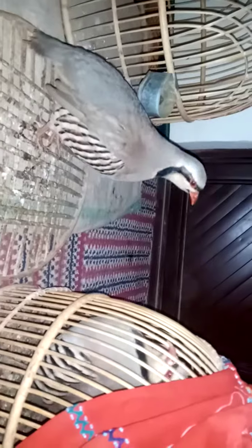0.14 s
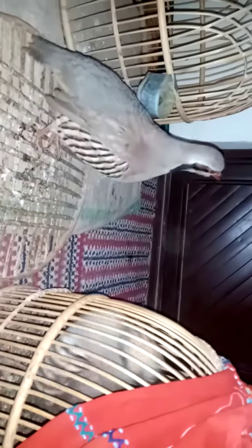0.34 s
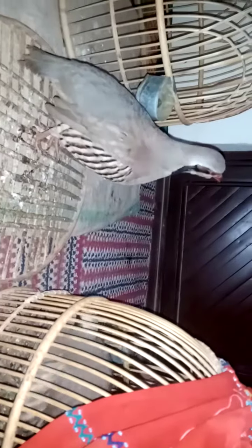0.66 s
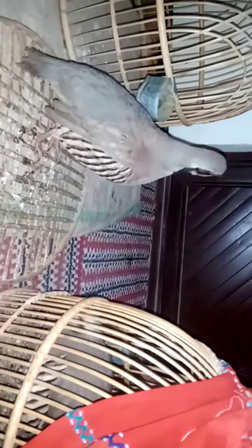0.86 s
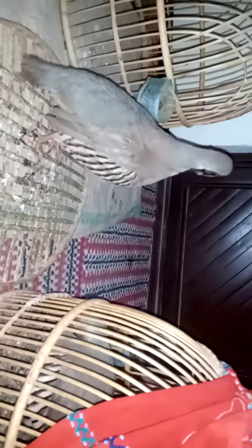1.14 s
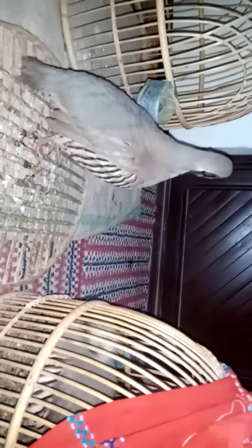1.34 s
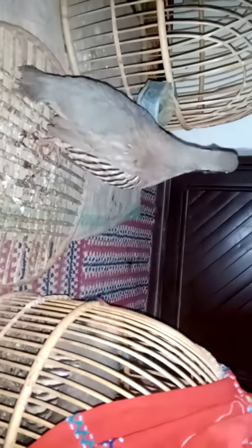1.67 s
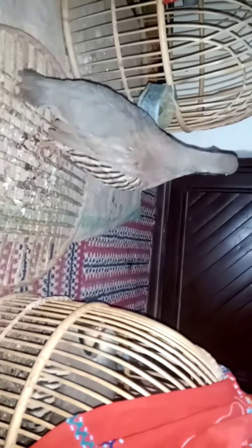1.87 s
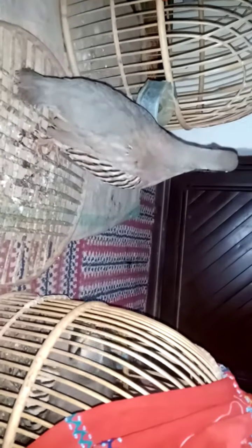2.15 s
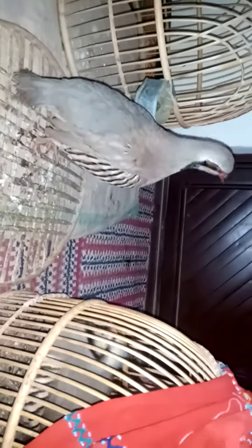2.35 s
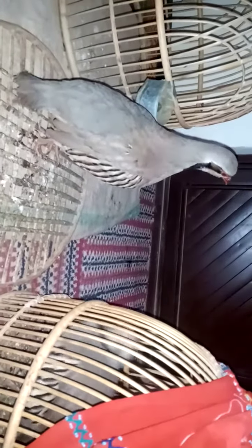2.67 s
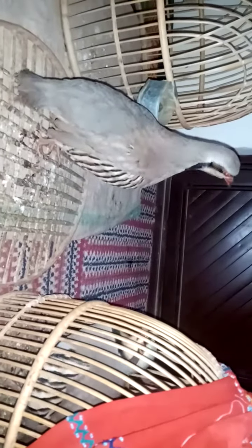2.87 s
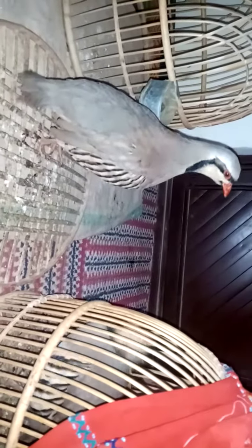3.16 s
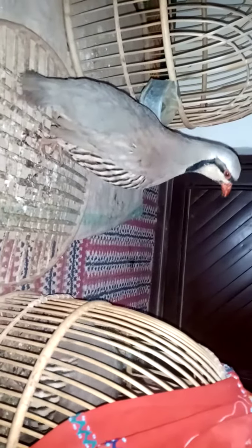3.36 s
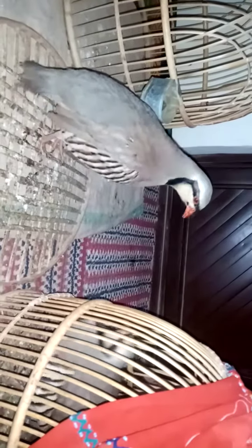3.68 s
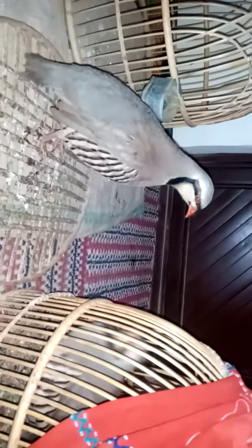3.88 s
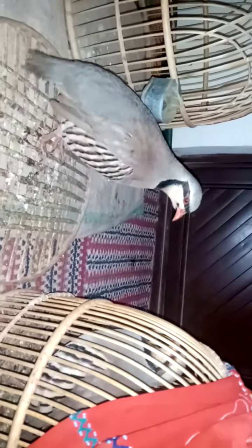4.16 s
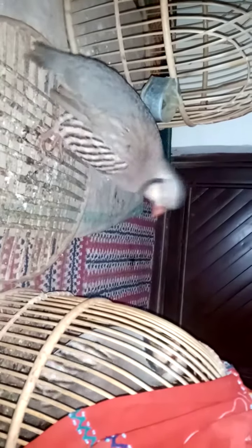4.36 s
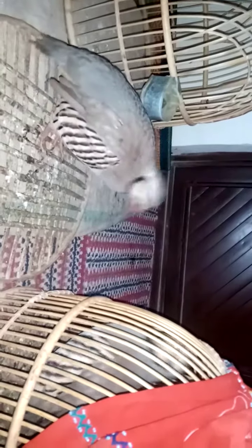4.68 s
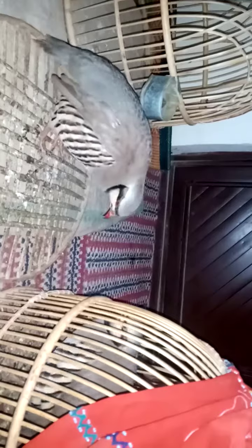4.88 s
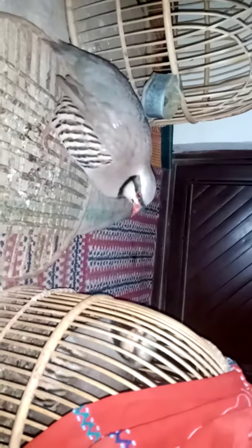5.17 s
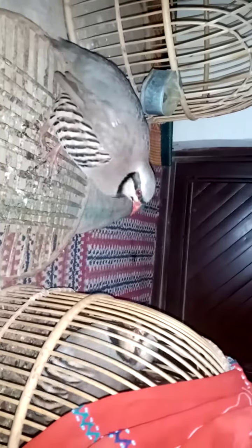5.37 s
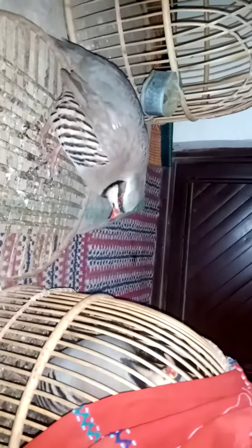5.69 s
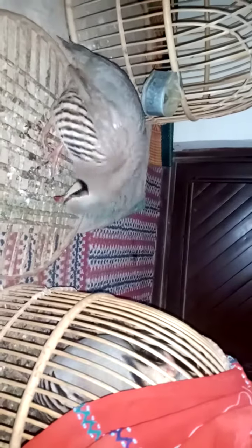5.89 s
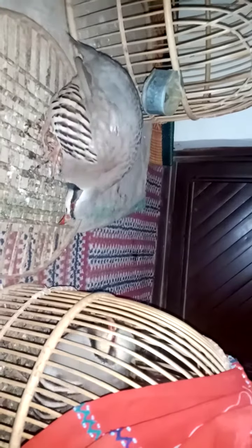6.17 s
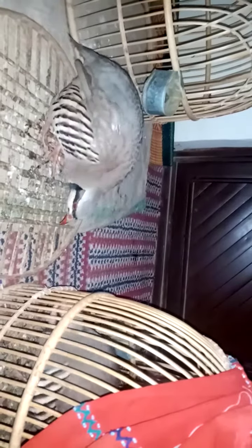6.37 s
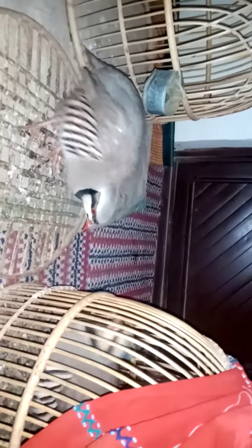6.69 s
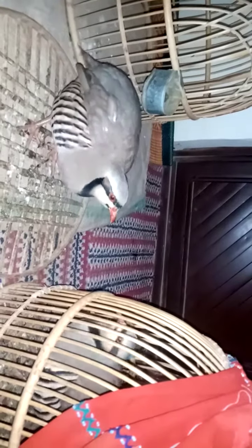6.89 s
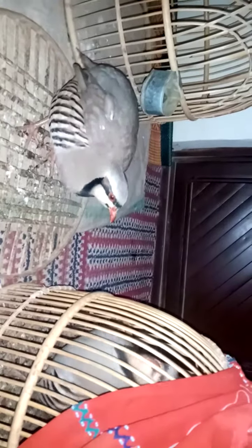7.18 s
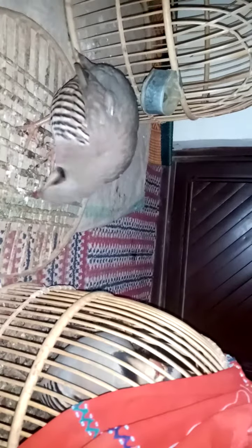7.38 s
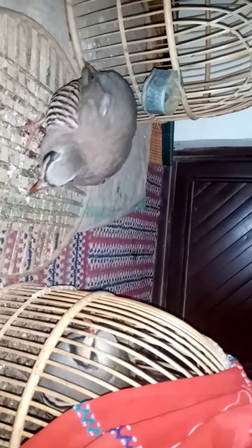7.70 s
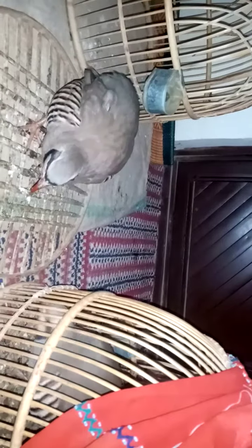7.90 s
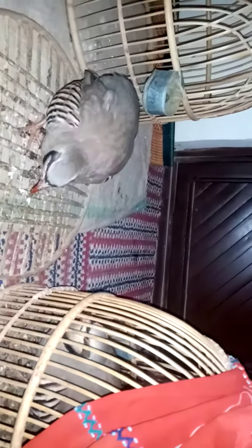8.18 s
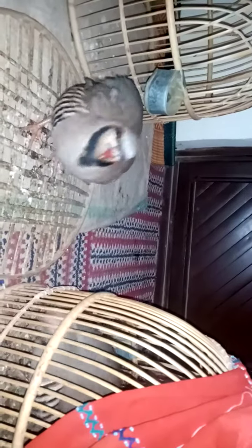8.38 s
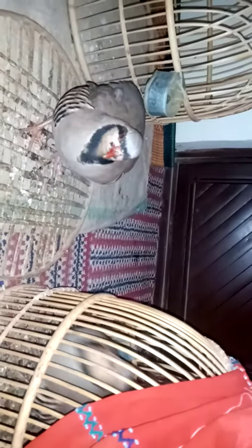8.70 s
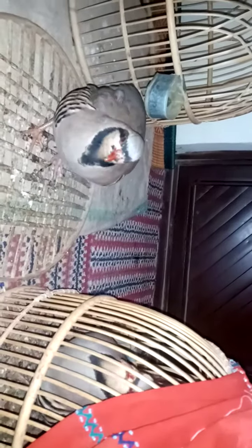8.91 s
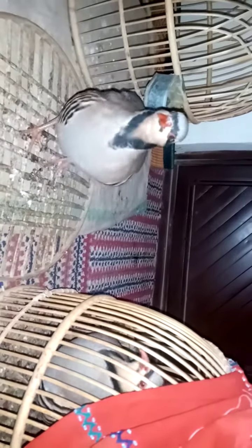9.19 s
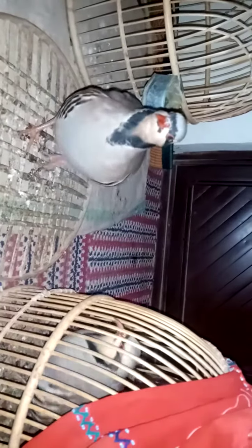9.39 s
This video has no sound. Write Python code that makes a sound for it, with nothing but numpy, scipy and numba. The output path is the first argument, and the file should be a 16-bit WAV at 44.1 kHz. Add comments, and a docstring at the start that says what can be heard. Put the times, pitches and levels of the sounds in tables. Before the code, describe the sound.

A partridge calls without a break, close to the microphone in a small room. From the start until about 4 seconds it gives a fast run of short, hoarse rasps and falling clucks, several each second, with an occasional high squeak among them. From about 4.5 to 7 seconds the clucking eases off and the squeaks stand out, roughly two a second, each climbing, arching and dropping into a brief rattle. From about 7 seconds the clucks pick up again, softer and rounder than at first, and continue to the end at around 9.5 seconds, with one faint squeak near 9 seconds. A few light, dry ticks of beak and claws on a mat come mostly in the second half, the clearest at about 8.6 seconds. The room rings briefly after every note, and a faint steady hiss lies underneath.

```python
"""A small room with cane cages; a chukar partridge calls without a break, close to a phone's microphone.
Its syrinx rattles in hoarse rasps, most phrases close on a falling cluck, and now and then it tightens
into a squeak that climbs, flips into a high arch and drops back into a rattle. Softer notes ring more in
the chest. Beak and claws tick on the mat, and the room rings briefly after every note, over faint hiss."""
import sys
import numpy as np
from scipy import signal
from scipy.fft import rfft, irfft
from scipy.io import wavfile
from numba import njit

SR = 44100
rng = np.random.default_rng(int(sys.argv[2]) if len(sys.argv) > 2 else 0)


def waveform_to_disk(signal):
    """Save audio, clipped to [-1, 1], as 16-bit WAV at the path in sys.argv[1]."""
    frames = np.transpose(np.atleast_2d(signal))
    scaled = np.clip(frames, -1, 1) * 32767
    samples = np.round(scaled).astype(np.int16)
    wavfile.write(sys.argv[1], SR, samples)


N = 420713

# still air and microphone hiss: (frequency [Hz], level [dB])
ROOM_TONE = [(25, -4.5), (70, -9.5), (150, 2), (300, -0.5), (700, -5), (2000, -7.5), (6000, -12),
             (12000, -17.5), (15500, -10.5)]
# swells of a faint low rumble: (time [s], level [dB])
RUMBLE_SWELLS = [(.53, -75.5), (.66, -77.5), (1.201, -79.5), (1.72, -80.5), (2.631, -79.5), (3.22, -76.5),
                 (3.62, -81.5), (4.609, -77.5), (4.81, -81.5), (5.859, -76), (6.25, -85), (8.13, -84),
                 (8.45, -82), (8.64, -75.5)]
# colour of the room's ring: (frequency [Hz], gain [dB])
ROOM_COLOUR = [(100, -13.5), (400, 2), (800, 7.5), (1300, -1), (1750, -3.5), (2500, -4.5), (4000, 1),
               (6000, 0), (9000, 0.5), (16000, -15.5)]
# how long the room rings: (frequency [Hz], time to fall 60 dB [s])
ROOM_T60 = [(300, 0.45), (900, 0.34), (1600, 0.46), (3000, 0.38), (6000, 0.36), (12000, 0.16)]
# resonances of the room, a tick and a footfall: (frequency [Hz], width [Hz], gain [dB])
ROOM_MODES = [(457, 13, -7.5), (1860, 190, -4), (3200, 630, -7), (3820, 25, 7), (4860, 31, 3),
              (5630, 90, 3.5)]
TICK_MODES = [(1340, 250, 11), (2130, 730, 10), (3550, 770, -1.5), (5530, 1200, -9), (8100, 4600, -34.5)]
STEP_MODES = [(153, 37, -7), (330, 490, 0), (666, 280, -22)]
# beak and claws on the mat: (time [s], peak level [dB])
TICKS = [(1.306, -45), (2.591, -46), (6.583, -43), (7.558, -45.5), (7.593, -40), (7.860, -64.5),
         (7.908, -53.5), (8.012, -47.5), (8.376, -51.5), (8.416, -52.5), (8.627, -33)]
# resonances of the bird's airway: (frequency [Hz], width [Hz], gain [dB])
CHEST_MODES = [(450, 140, -5), (570, 80, 0.5), (765, 76, -2), (846.7, 91, 8.5), (1095, 354, 1.5)]
WINDPIPE_MODES = [(1180, 242, 1.8), (1647, 260, 1.7)]
BEAK_MODES = [(2050, 360, 2.5), (2217, 920, -3), (3050, 1630, -7.5)]
# the crouching bird draws in its neck and its chest rings lower: (time [s], chest tuning [factor])
POSTURE = [(0, 0.99), (6.7, 0.94), (7.3, 0.86), (9.5, 0.9)]
# chest of a soft note as the bird stretches, eases off and crouches: (time [s], relative level [dB])
CHEST_LEVELS = [(0, -1), (3.9, -2.5), (4.6, -4), (5.2, -8.5), (5.85, 2), (6.55, 0), (7.04, -10), (7.14, 0),
                (8.5, 0), (9.5, -1)]
# breath in rasps and clucks, fading as the bird eases off: (time [s], relative level [dB])
HISS_LEVELS = [(0, -19.5), (1.5, -17.5), (3, -19), (3.7, -16), (4.2, -19), (4.7, -21), (5.3, -38.5),
               (6, -23.5), (7.1, -35), (7.6, -25.5), (9.5, -28)]
# colour of the breath in a hoarse note and in a squeak: (frequency [Hz], gain [dB])
HOARSE_HISS = [(2500, -41), (3000, -17), (3400, 2), (4200, 4), (4700, -4), (5400, 0), (6600, -18),
               (7500, -9.5), (8500, -36.5), (11000, -37), (12000, -23.5), (13000, -41), (16000, -43.5)]
SQUEAK_HISS = [(400, -24.5), (900, -7.5), (2000, 18), (3500, 9), (5800, 6), (7000, -14.5), (8600, -27.5),
               (10000, -22.5), (12500, -21.5), (16000, -25)]
# what the airway lets through of a squeak: (frequency [Hz], gain [dB])
SQUEAK_AIRWAY = [(200, -39.5), (500, -13.5), (900, 3), (4200, 0.5), (4800, -1), (5800, 1.5), (7600, -6.5),
                 (8700, -11.5), (10000, 2), (12500, 7), (16000, 5.5)]
# whistles in two registers: (time [s], climb [s], arch [s], low pitch [Hz], top pitch [Hz],
# pointedness of the arch [exponent], relative levels of climb [dB], arch [dB], drop [dB], roughness [0-1])
SQUEAKS = [(.056, 0.012, 0.024, 1868, 3050, 0.54, -24.5, -37, -37.5, 0.5),
           (.487, 0.023, 0.0098, 1828, 3370, 0.62, -22.5, -36.5, -25.5, 0),
           (0.998, 0.024, 0.0066, 1770, 2920, .6, -30, -41.5, -44, .15),
           (1.028, .011, 0.009, 1777, 3100, 0.5, -33, -43.5, -34, .2),
           (1.727, .013, .017, 1724, 3260, 0.35, -26.5, -33.5, -33, .45),
           (2.607, .024, 0.0029, 1816, 2070, .6, -31, -29, -29, .2),
           (3.331, 0.022, 0.031, 1908, 3330, 0.46, -32.5, -37.5, -42.5, 0.37),
           (3.947, 0.02, 0.029, 1705, 2726, 0.45, -30.5, -34.5, -38.5, 0.37),
           (4.371, .017, 0.026, 1731, 2796, 0.48, -38, -35, -35.5, 0.52),
           (4.647, 0.022, 0.061, 1694, 4010, 0.32, -30.5, -36.5, -37.5, 0.46),
           (5.087, 0.0097, 0.066, 1696, 4500, 2.6, -27.5, -31, -34.5, 0.23),
           (5.512, 0.0085, .054, 1634, 3650, 3.2, -40, -33.5, -36, 0.61),
           (5.945, 0.021, .053, 1848, 3750, .25, -38.5, -41.5, -40, 0.42),
           (6.233, .032, 0.063, 1901, 4010, 0.56, -28.5, -40, -31.5, 0.27),
           (6.653, 0.025, 0.041, 1736, 3344, 0.88, -36, -35.5, -33.5, 0.24),
           (8.976, 0.018, 0.027, 1580, 3020, 1.16, -40.5, -56.5, -48, 0.02)]
# notes that slide down as the throat relaxes:
# (time [s], length [s], throat resonance [Hz], relative level [dB])
CLUCKS = [(.003, 0.048, 1293, -34.5), (0.284, 0.033, 1360, -31), (0.616, 0.048, 1300, -34.5),
          (0.875, 0.037, 1282, -35.5), (1.188, 0.024, 1300, -33.5), (1.215, 0.038, 1374, -31),
          (1.47, 0.036, 1296, -34), (1.798, 0.046, 1334, -32.5), (2.089, 0.038, 1305, -30),
          (2.432, 0.045, 1256, -35.5), (2.754, .043, 1278, -34), (3.106, .033, 1303, -31),
          (3.412, 0.034, 1312, -31), (3.756, 0.032, 1330, -31), (4.087, .033, 1355, -28.5),
          (7.13, 0.062, 1410, -50.5), (7.558, 0.073, 1500, -56), (8.265, 0.078, 1540, -51),
          (8.665, .06, 1470, -47.5), (9.114, .04, 1300, -46), (9.512, 0.044, 1447, -42.5)]
# hoarse notes: (time [s], length [s], starting pitch [Hz], relative level [dB], relative beak ring [dB])
RASPS = [(.181, 0.045, 561.5, -32.5, -11), (0.217, 0.07, 410, -47, -15),
         (0.351, 0.026, 421.5, -45.5, -23.5), (0.464, 0.036, 573, -34, -3), (0.564, 0.084, 463.4, -43, -3),
         (0.803, 0.039, 537.3, -33.5, -4), (0.836, 0.038, 604, -39, -3.5), (1.06, 0.031, 651, -35.5, -1),
         (1.158, .034, 330, -42, 1), (1.394, 0.042, 570, -32.5, -4.5), (1.427, 0.04, 598, -40, -2.5),
         (1.622, 0.041, 278.4, -45.5, -25), (1.655, .034, 560, -37.5, 0.5), (1.769, 0.046, 553, -37, 2),
         (1.988, 0.044, 621, -32.5, -4.5), (2.035, 0.029, 590, -35, 0), (2.277, 0.043, 570, -38, -2.5),
         (2.379, 0.027, 309, -45, -0.5), (2.406, 0.034, 304, -45, 0.5), (2.622, .06, 297.3, -36, 3),
         (2.725, 0.044, 283.2, -41.5, -2), (2.947, 0.043, 302.6, -37.5, -2.5), (3.046, 0.039, 330, -44, -1),
         (3.081, 0.029, 314, -36.5, -12), (3.29, .04, 296.5, -34.5, -3.5), (3.39, 0.028, 293.8, -38, -2.5),
         (3.594, 0.031, 291.3, -32.5, -16), (3.695, 0.042, 449, -43, -6), (3.728, 0.034, 284.8, -31.5, -20),
         (3.863, 0.028, 511, -48.5, -17), (3.937, 0.036, 446.3, -35, -12), (4.035, 0.043, 341, -42.5, -9),
         (4.067, .023, 487.6, -31, -34), (4.279, 0.039, 568, -37.5, -14), (4.361, 0.02, 441, -54.5, -11),
         (4.497, 0.012, 570, -54.5, 0.5), (4.626, 0.041, 631, -35.5, 6), (4.808, 0.02, 430, -47, -2),
         (4.989, 0.038, 551.5, -42, -6.5), (5.206, 0.021, 551, -46, -12), (5.242, 0.025, 454.4, -52.5, -2),
         (5.425, 0.03, 591.6, -40, -37), (5.846, .03, 935, -45, 1), (6.093, 0.024, 448, -62.5, -4),
         (6.546, 0.044, 647, -51.5, 4.5), (6.811, 0.026, 479, -57, -20.5),
         (7.002, .036, 422.6, -40.5, -4.5), (7.027, .042, 545, -43, -3.5),
         (7.102, 0.034, 280.7, -42.5, -17), (7.41, 0.038, 535.7, -44.5, -2.5),
         (7.502, 0.046, 424.5, -49.5, -16), (7.806, .046, 631, -53.5, 7), (7.85, 0.026, 499, -57, -20.5),
         (8.122, 0.024, 517, -45, -26), (8.203, 0.059, 677, -45.5, 6), (8.513, 0.047, 339, -49.5, -20),
         (8.599, 0.076, 269.2, -44, -2.5), (8.943, 0.042, 513.6, -41.5, -9),
         (9.044, 0.036, 270, -46, -11.5), (9.074, 0.051, 388.6, -50.5, -10),
         (9.339, 0.032, 450, -46.5, -21), (9.376, 0.065, 693, -49, 8.5), (9.434, 0.093, 459, -48, -15)]

OVERLAP_S = .003  # one register sounds on while the next one starts


def undb(db):
    """Decibels to gain."""
    return 10 ** (np.asarray(db) / 20)


def unit(x):
    """Scale to rms 1."""
    return x / np.sqrt(np.mean(x ** 2) + 1e-20)


def add(track, start_s, sound):
    """Mix a sound into a track."""
    i = max(int(start_s * SR), 0)
    track[i:i + len(sound)] += sound[:max(len(track) - i, 0)]


def at_time(points, time_s):
    """Read (time [s], value) points at one moment."""
    return np.interp(time_s, *np.transpose(points))


def along(points, n):
    """Read (frequency [Hz], value) points across an n-sample spectrum."""
    hz, value = np.transpose(points)
    return np.interp(np.log(np.arange(n // 2 + 1) * SR / n + 1), np.log(hz), value)


def colour(x, points):
    """Shape a sound with a smooth (frequency [Hz], gain [dB]) curve."""
    return irfft(rfft(x) * undb(along(points, len(x))), len(x))


def wander(n, rate_hz):
    """Smooth random drift with a spread near 1."""
    place = np.arange(n) * rate_hz / SR
    return np.sqrt(3 / 2) * np.interp(place, np.arange(n), rng.standard_normal(n))


@njit
def bandpass(x, hz, width_hz):
    """State-variable band-pass whose centre may move every sample."""
    out, band_state, low_state = np.empty(len(x)), 0., 0.
    for i in range(len(x)):
        gain, damping = np.tan(np.pi * hz[i] / SR), width_hz / hz[i]
        band = (band_state + gain * (x[i] - low_state)) / (1 + gain * (gain + damping))
        band_state = 2 * band - band_state
        low_state += 2 * gain * band
        out[i] = damping * band
    return out


def resonate(x, hz, width_hz):
    """A resonance with steep skirts."""
    centre = hz * np.ones(len(x))
    return bandpass(bandpass(x, centre, float(width_hz)), centre, float(width_hz))


def body(x, modes):
    """Several resonances side by side."""
    return sum(undb(db) * resonate(x, hz, width) for hz, width, db in modes)


def background():
    """Far behind the bird: a low rumble that swells and sinks, under even air and microphone hiss."""
    t = np.arange(N) / SR
    fade_s = .061
    swells = sum(undb(db) * np.exp(-np.abs(t - time_s) / fade_s) for time_s, db in RUMBLE_SWELLS)
    rumble = unit(resonate(rng.standard_normal(N), hz=140, width_hz=89)) * swells
    return rumble + undb(-83.5) * unit(colour(rng.standard_normal(N), ROOM_TONE))


def room(x, early_db, tail_db):
    """Quick reflections off floor and door, then a diffuse ring that dies soonest in the high treble."""
    n = SR
    t = np.arange(n) / SR
    noise = rfft(rng.standard_normal(n))
    tail = np.zeros(n)
    for k, (_, t60) in enumerate(ROOM_T60):
        share = along([(hz, j == k) for j, (hz, _) in enumerate(ROOM_T60)], n)
        tail += irfft(noise * share, n) * np.exp(-np.log(1000) * t / t60)
    tail = tail + body(tail, ROOM_MODES)
    tail = unit(colour(tail * np.clip(t / .02, 0, 1), ROOM_COLOUR))
    reflections = rng.standard_normal(n) * (rng.random(n) < .03)
    early = unit(reflections * (t > .0015) * np.exp(-t / .007))
    response = (undb(early_db) * early + undb(tail_db) * tail) / np.sqrt(n)
    return signal.fftconvolve(x, response)[:N]


def knock(modes, db, contact_s):
    """A brief scraping contact rings a set of resonances."""
    t = np.arange(SR // 10) / SR
    scrape = rng.standard_normal(len(t)) * np.exp(-t / contact_s) * (1 - np.exp(-t / .00018))
    ring = body(scrape, modes)
    return undb(db) * ring / np.abs(ring).max()


def pecks_and_step():
    """Close by on the mat: dry ticks of beak and claws, and one soft footfall."""
    out = np.zeros(N)
    for start, db in TICKS:
        add(out, start, knock(TICK_MODES, db, contact_s=.0033))
    add(out, start_s=4.594, sound=knock(STEP_MODES, db=-42.5, contact_s=.0012))
    return out


def swell(n, peak, sharpness):
    """A push of air that rises to its peak (0-1 of the length) and dies away."""
    angle = np.interp(np.linspace(0, 1, n), [0, peak, 1], [0, np.pi / 2, np.pi])
    return np.abs(np.sin(angle)) ** sharpness


def progress(length_s):
    """A ramp from 0 to 1 over one part of a squeak and its overlap."""
    return np.linspace(0, 1, int((length_s + OVERLAP_S) * SR))


def whistle(hz, rough, second_db, third_db, hiss_db):
    """Taut membranes whistle with two overtones; a slower flutter roughens the whistle into side tones."""
    n = len(hz)
    rough = np.clip(rough, .25, .8)
    phase = 2 * np.pi * np.cumsum(hz * (1 + .06 * rough * wander(n, 600))) / SR
    flutter_hz = 800 * np.exp(.26 * wander(n, 300))
    flutter = np.sin(2 * np.pi * np.cumsum(flutter_hz) / SR)
    tone = np.sin(phase) + undb(second_db) * np.sin(2 * phase) + undb(third_db) * np.sin(3 * phase)
    tone *= 1 + rough * (.85 * flutter + .7 * wander(n, 1800))
    hiss = unit(colour(rng.standard_normal(n), SQUEAK_HISS))
    return np.sqrt(2) * tone + undb(hiss_db) * rough * hiss


def high_arch(length_s, top_hz, pointed, rough):
    """The high register arches, leaning late; away from the beak's ring it thins and roughens."""
    flip_hz, beak_ring_hz, thin_db_per_octave = 2638, 2905, 30.5
    u = progress(length_s)
    foot_hz = min(flip_hz, top_hz)
    hz = foot_hz + (top_hz - foot_hz) * np.abs(np.sin(np.pi * u ** 1.45)) ** pointed
    thinning_db = thin_db_per_octave * np.abs(np.log2(hz / beak_ring_hz))
    wavering_hz = hz * (1 + .04 * wander(len(u), rate_hz=130))
    rough = max(rough, .42) + .035 * thinning_db
    tone = whistle(wavering_hz, rough, second_db=-22, third_db=-35.5, hiss_db=-11)
    return undb(-thinning_db) * swell(len(u), peak=.15, sharpness=.25) * tone


def squeaks():
    """The syrinx tightens: its whistle climbs, flips up into a rougher arch and drops back."""
    out = np.zeros(N)
    for start, climb_s, arch_s, low_hz, top_hz, pointed, climb_db, arch_db, drop_db, rough in SQUEAKS:
        onset = start - OVERLAP_S / 2
        climb_hz = low_hz * np.exp(.33 * (progress(climb_s) - .5))
        climb = whistle(climb_hz, rough * .37, second_db=-31, third_db=-42.5, hiss_db=-7.5)
        climb *= swell(len(climb), peak=.73, sharpness=1.1)
        add(out, onset, undb(climb_db) * climb)
        add(out, onset + climb_s, undb(arch_db) * high_arch(arch_s, top_hz, pointed, rough))
        drop_hz = low_hz * 1.15 * np.exp(-.479 * progress(length_s=.029))
        drop = whistle(drop_hz, rough * 1.62, second_db=-32, third_db=-39.5, hiss_db=-11)
        drop *= swell(len(drop), peak=.1, sharpness=1.1)
        add(out, onset + climb_s + arch_s, undb(drop_db) * drop)
    return colour(out, SQUEAK_AIRWAY)


def syrinx(hz, jitter, air):
    """Slack membranes slap unevenly, strong and weak in turn, with a puff of turbulence every cycle."""
    n = len(hz)
    phase = np.cumsum(hz * np.exp(jitter * wander(n, 420))) / SR
    cycle = np.floor(phase)
    slaps = np.diff(cycle, prepend=0) * undb(1.5 * wander(n, 400) - 3 * (cycle % 2))
    puffs = rng.standard_normal(n) * np.exp(-(phase % 1) / .55)
    return unit(slaps) + air * unit(puffs)


def hoarse_note(start, length_s, db, *, peak, sharpness, pitch_hz, fall_nepers, jitter, air, throat_hz,
                throat_width_hz, slide, windpipe_db, chest_db, beak_db, hiss_db, fundamental_db):
    """One push of air: the rattle sinks in pitch and rings throat, windpipe, chest and beak."""
    n = int((length_s + .009) * SR)
    u = np.linspace(0, 1, n)
    push = swell(n, peak, sharpness)
    pitch = pitch_hz * np.exp(-fall_nepers * u ** 2)
    neck_bob = np.exp(.03 * rng.standard_normal())  # the neck moves between notes
    posture = at_time(POSTURE, start) * neck_bob
    source = syrinx(pitch, jitter, air)
    passband = signal.butter(5, [430 * posture, 2803], "bandpass", fs=SR, output="sos")
    rattle = signal.sosfilt(passband, source)
    # the throat widens during the note, so its resonance drops ever faster
    centre_hz = throat_hz * np.exp(slide * (.42 - u ** 1.63))
    throat = unit(resonate(rattle, centre_hz, throat_width_hz) * push)
    windpipe = undb(windpipe_db) * unit(body(rattle, WINDPIPE_MODES) * push)
    chest_modes = [(hz * posture, width, gain) for hz, width, gain in CHEST_MODES]
    chest = undb(chest_db - .5) * unit(body(rattle, chest_modes) * push ** 1.6)
    beak = undb(beak_db - 4) * unit(body(rattle, BEAK_MODES) * push)
    # two higher resonances of the throat move with it and colour the hiss
    upper = resonate(source, centre_hz * 2.55, 260) + resonate(source, centre_hz * 3.45, 460)
    hiss = undb(hiss_db - 6.5) * unit(colour(source + undb(3.5) * upper, HOARSE_HISS) * push)
    # the fundamental surfaces as the pitch runs down, fading where it gets too low to radiate
    fundamental = unit(resonate(source, pitch, 99) * push ** .5 * u) * (pitch / 400) ** 2
    fundamental *= undb(fundamental_db + chest_db)
    return undb(db) * (unit(throat + windpipe) + chest + beak + hiss + fundamental)


def squeak_rattles():
    """As a squeak drops, the membranes go slack and break into a bright rattle."""
    out = np.zeros(N)
    for start, climb_s, arch_s, *_, drop_db, _ in SQUEAKS:
        onset = start + climb_s + arch_s
        db = -42 + .3 * (drop_db + 31)  # a louder drop leaves a louder rattle
        add(out, onset - .002, hoarse_note(
            onset, length_s=.029, db=db, peak=.18, sharpness=1.1,
            pitch_hz=430, fall_nepers=.25, jitter=.05, air=.42,
            throat_hz=1570, throat_width_hz=150, slide=.3,
            windpipe_db=-.5, chest_db=-22, beak_db=4.5, hiss_db=-32, fundamental_db=-33))
    return out


def chest_level(start, db):
    """Soft notes ring mostly in the chest; a harder push moves the sound into the throat."""
    soft_db = -47
    return at_time(CHEST_LEVELS, start) - .89 * max(db - soft_db, -3)


def clucks():
    """Rounder notes close a phrase: the pitch nearly halves and a narrow resonance slides down too."""
    out = np.zeros(N)
    for start, length_s, throat_hz, db in CLUCKS:
        chest_db = chest_level(start, db) - 2
        hiss_db = at_time(HISS_LEVELS, start) - 2.5
        add(out, start - .003, hoarse_note(
            start, length_s, db, peak=.53, sharpness=.71,
            pitch_hz=521.4, fall_nepers=.66, jitter=.045, air=.35,
            throat_hz=throat_hz, throat_width_hz=216, slide=.22,
            windpipe_db=-10, chest_db=chest_db, beak_db=-16, hiss_db=hiss_db, fundamental_db=-13))
    return out


def rasps():
    """Broad, hoarse notes up close: the wider the beak opens, the less the chest is heard."""
    out = np.zeros(N)
    shut_beak_db = 2.5
    for start, length_s, pitch_hz, db, beak_db in RASPS:
        chest_db = chest_level(start, db) - max(beak_db - shut_beak_db, 0)
        hiss_db = at_time(HISS_LEVELS, start)
        add(out, start - .004, hoarse_note(
            start, length_s, db, peak=.5, sharpness=1.2,
            pitch_hz=pitch_hz, fall_nepers=.26, jitter=.055, air=.45,
            throat_hz=1546, throat_width_hz=290, slide=.22,
            windpipe_db=0, chest_db=chest_db, beak_db=beak_db, hiss_db=hiss_db, fundamental_db=-31))
    return out


def scene():
    """One microphone: the bird close by, the room around it and the quiet behind."""
    calls = undb(-2) * rasps() + undb(-.38) * clucks() + undb(-2.25) * squeaks() + squeak_rattles()
    near = calls + pecks_and_step()
    return (near + room(near, early_db=-11, tail_db=-16.5) + background())[None]


def record(dry):
    """The phone cuts the top of the treble steeply."""
    top_hz = 15700
    return signal.sosfilt(signal.ellip(10, .2, 70, top_hz, fs=SR, output="sos"), dry)


dry = scene()
out = record(dry)
waveform_to_disk(out)
```